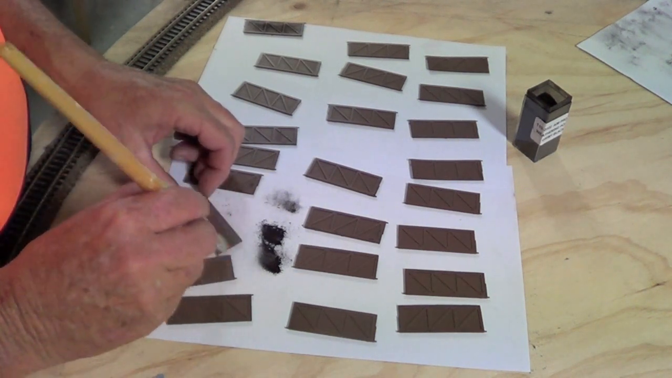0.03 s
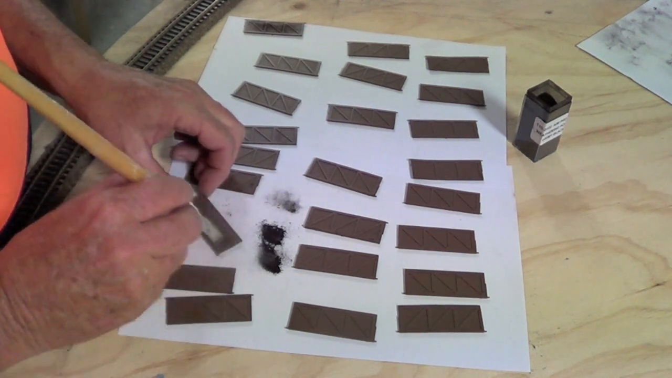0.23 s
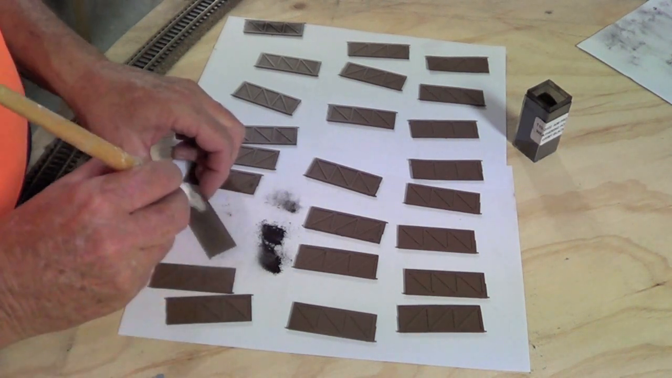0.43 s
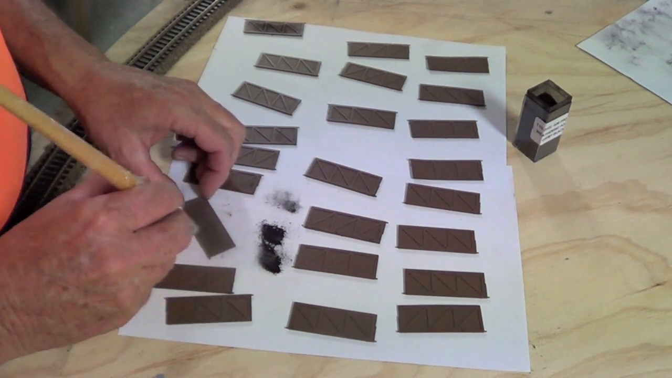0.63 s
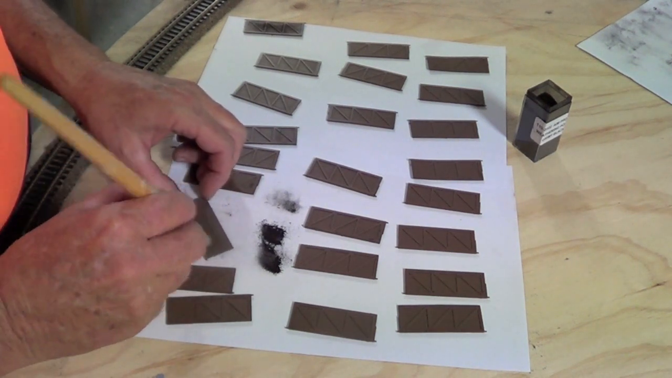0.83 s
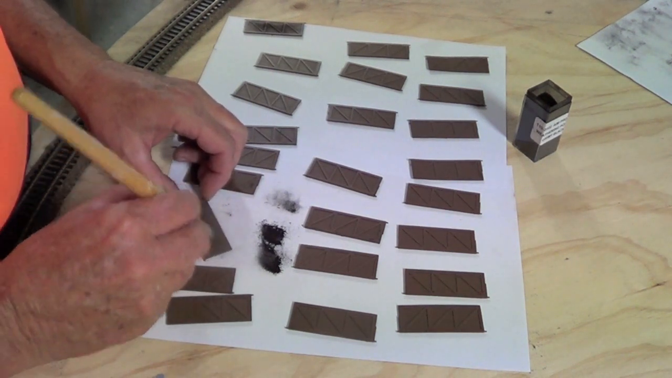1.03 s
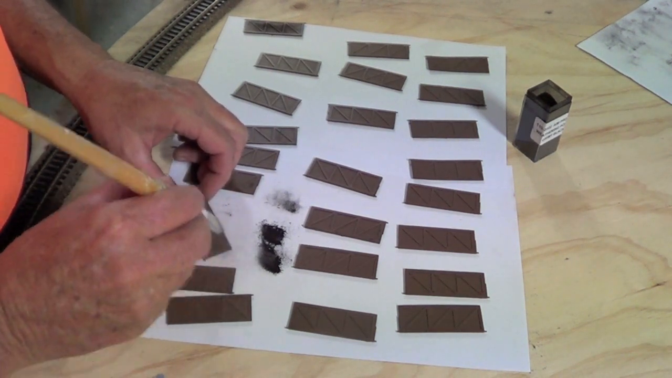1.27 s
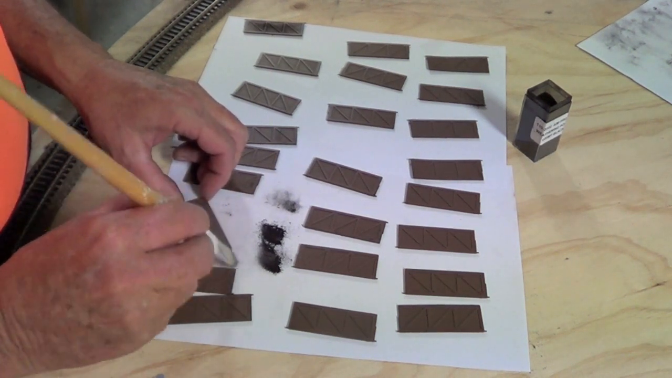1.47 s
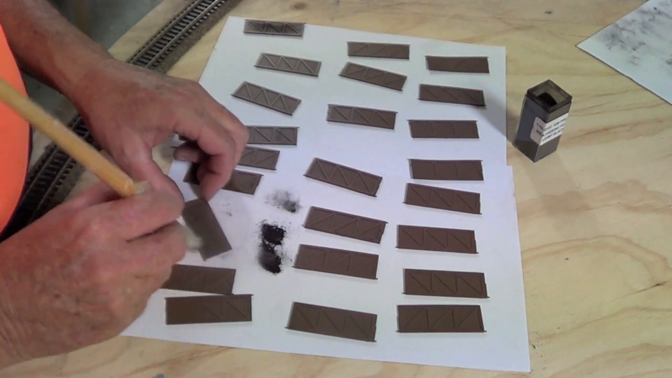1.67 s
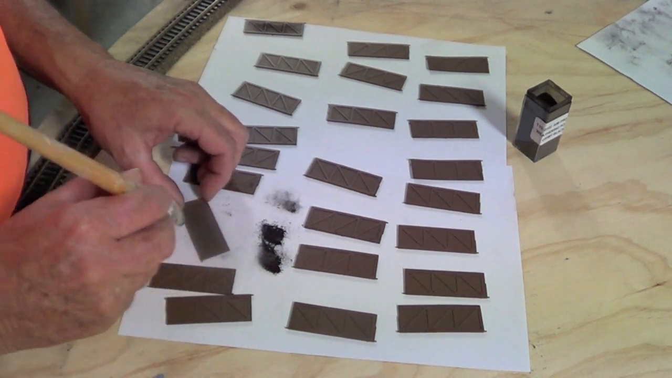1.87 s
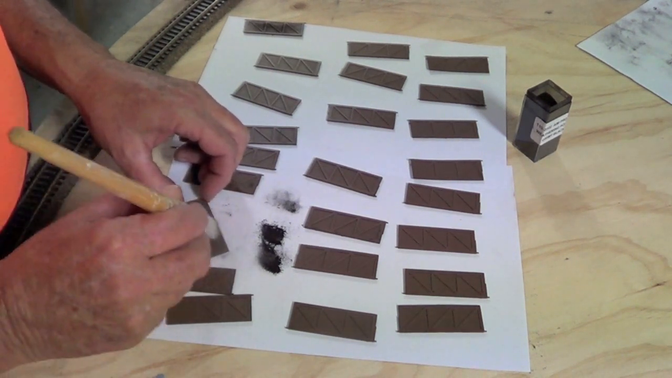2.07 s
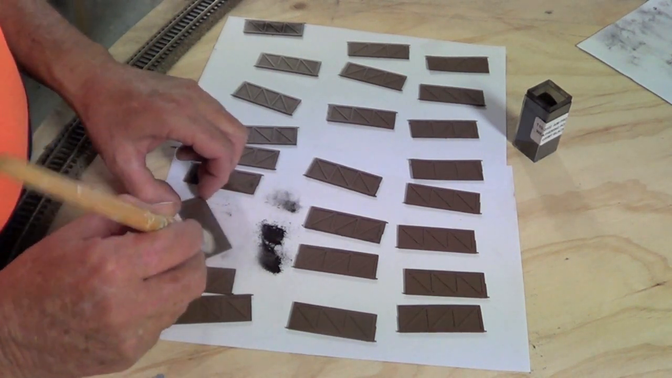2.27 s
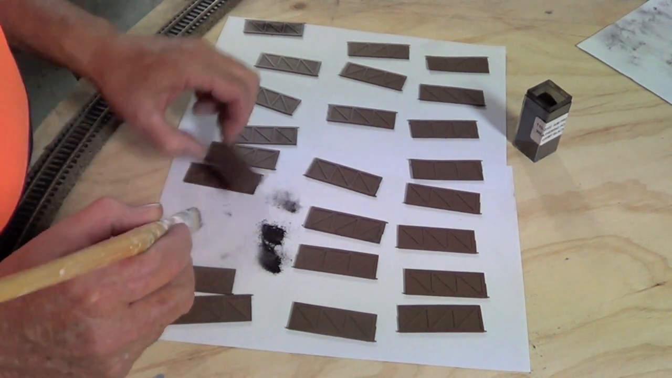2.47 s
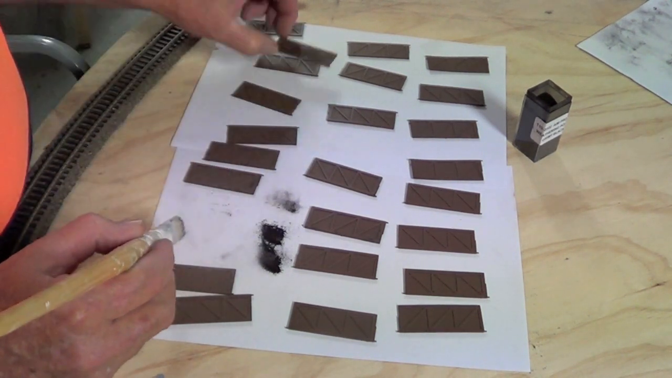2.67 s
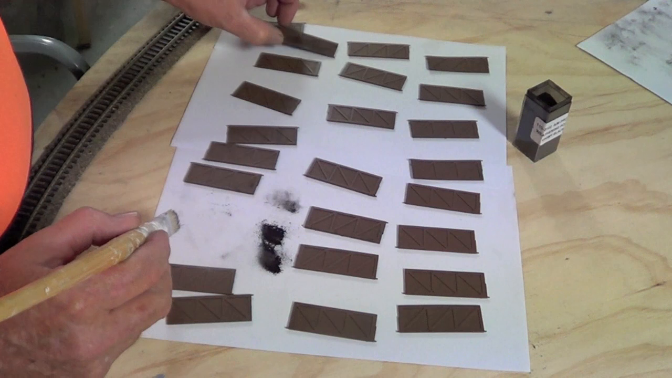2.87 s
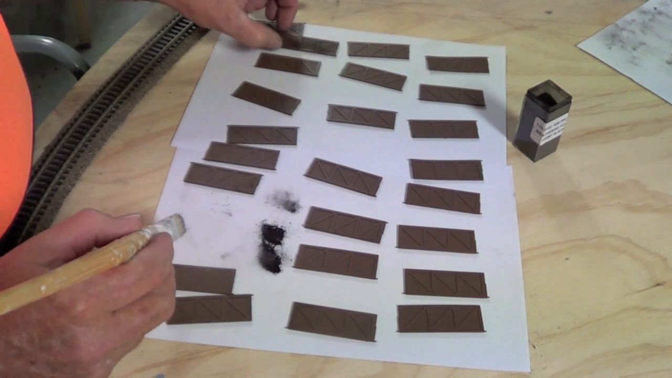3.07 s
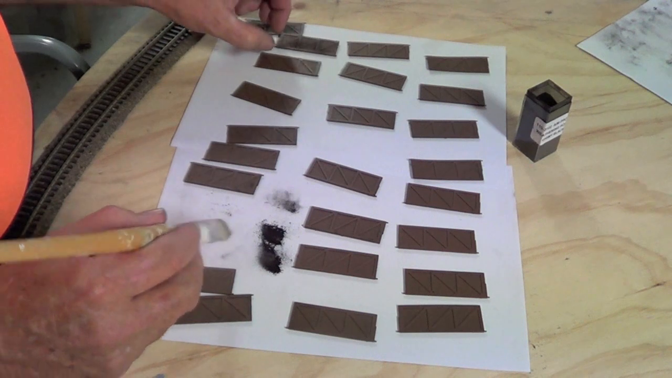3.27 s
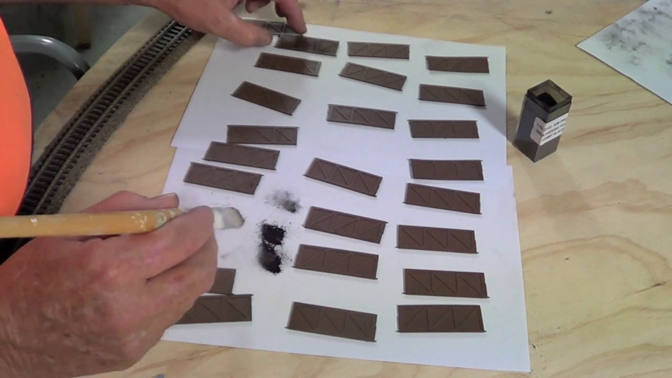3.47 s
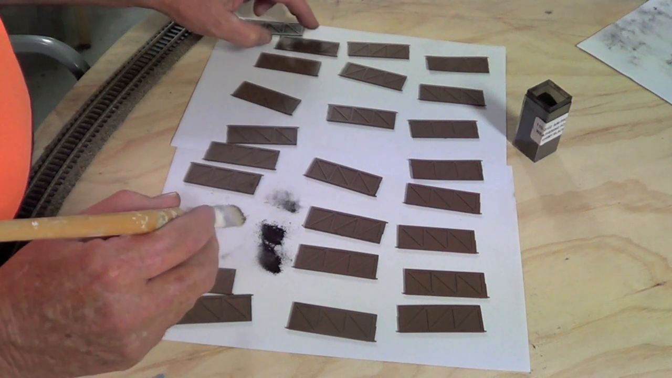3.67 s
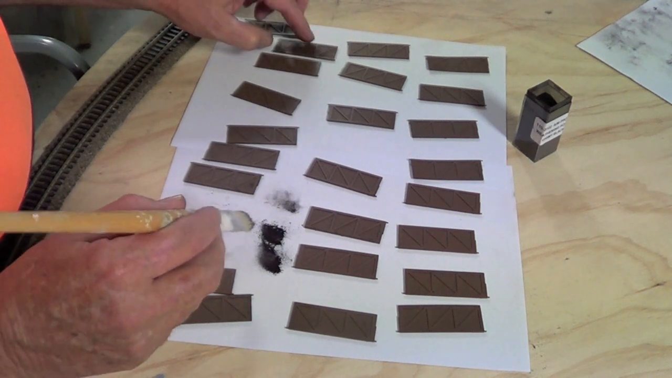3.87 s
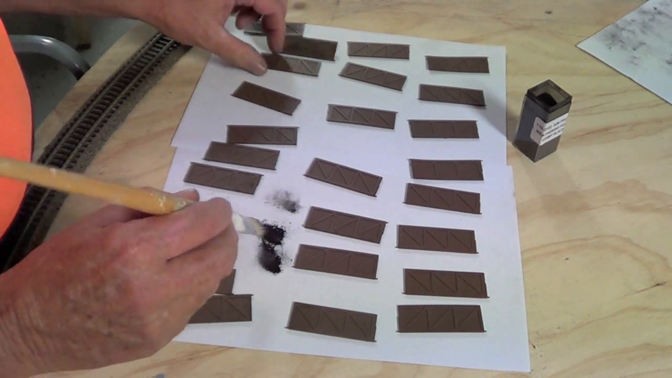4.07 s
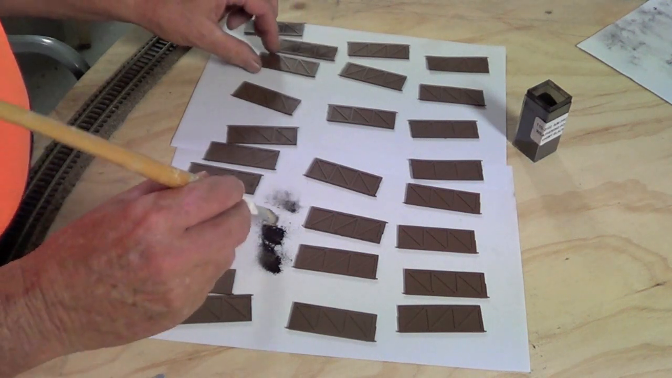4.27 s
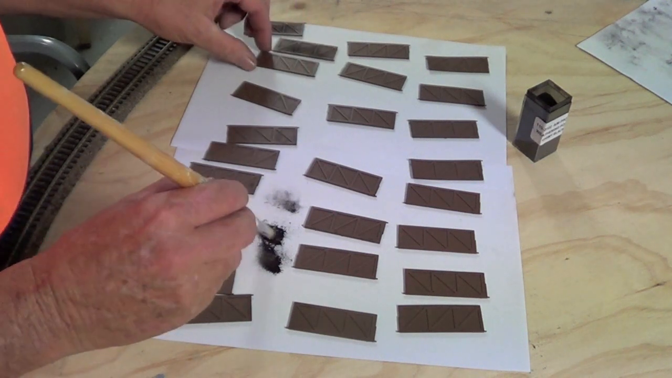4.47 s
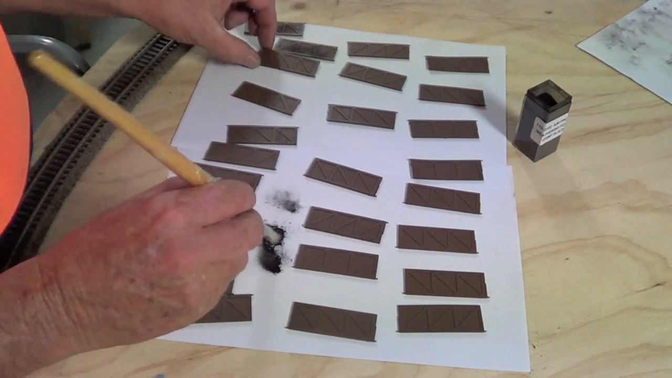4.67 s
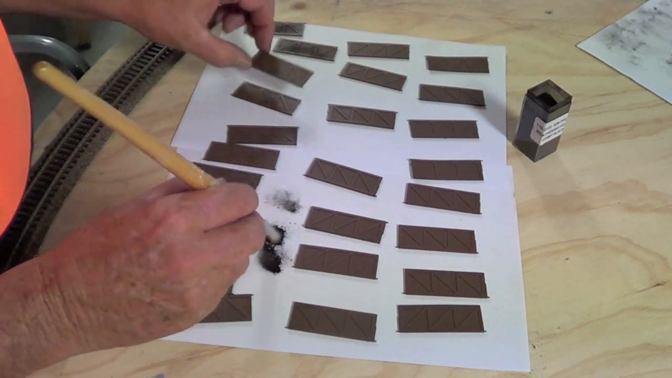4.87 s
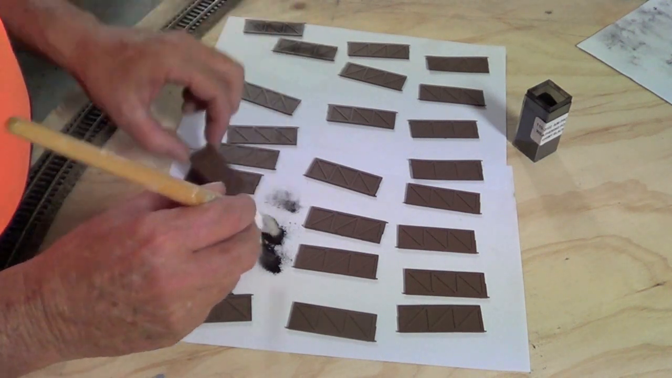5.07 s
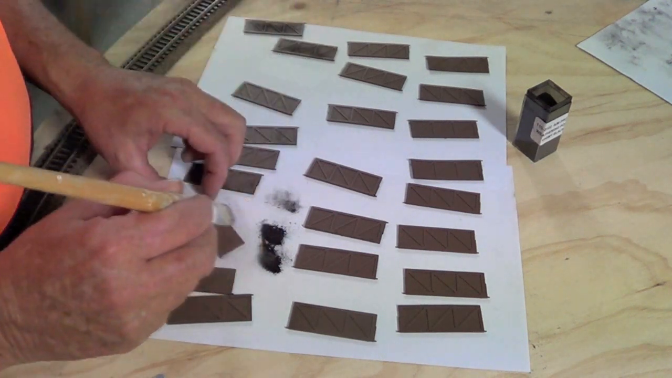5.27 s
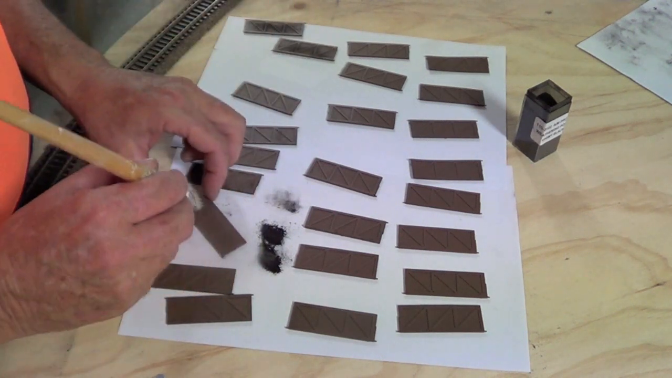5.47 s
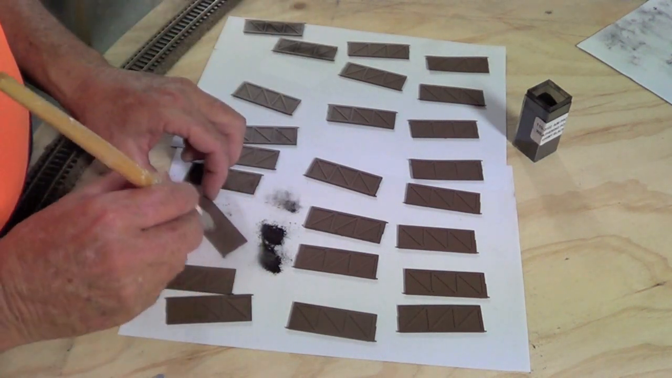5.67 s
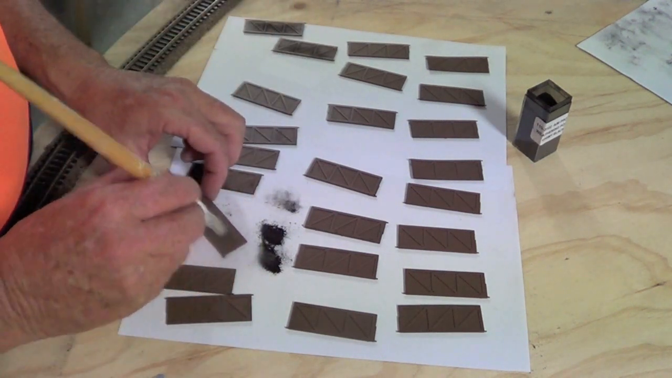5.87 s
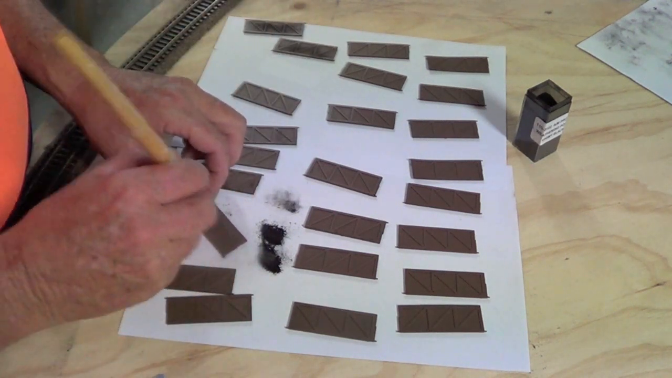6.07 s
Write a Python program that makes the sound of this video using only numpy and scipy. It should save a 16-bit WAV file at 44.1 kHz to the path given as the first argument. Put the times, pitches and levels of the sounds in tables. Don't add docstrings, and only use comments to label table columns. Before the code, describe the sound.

In a small workroom, dry scratchy brush strokes come in quick bursts, crackling as stiff bristles snap across thin plastic. A quiet gap follows, then a plastic piece clicks onto the bench, and the brush dabs powder with tiny ticks, a short squeak and sharper knocks on wood. Brief scrubbing returns at the end. Everything is close-miked over a low, soft fan hum and a faint steady high whine.

```python
import sys
import numpy as np
from scipy import signal
from scipy.fft import rfft, irfft, next_fast_len
from scipy.io import wavfile
from scipy.ndimage import uniform_filter1d

SR = 44100
rng = np.random.default_rng(int(sys.argv[2]) if len(sys.argv) > 2 else 0)


def to_linear_factor(level_db):
    exponent = np.asarray(level_db, float) / 20
    return 10 ** exponent


def dump_mix(stems):
    frames = np.atleast_2d(stems).T
    limited = np.clip(frames, -1, 1)
    pcm = np.round(limited * 32767).astype(np.int16)
    wavfile.write(sys.argv[1], SR, pcm)


N = 269451
TIME = np.arange(N) / SR

# (frequency [Hz], density [dB per Hz])
FAN_AIR = [(20, -22), (45, 0), (91, 0.5), (234, -6), (400, -11), (949, -8), (1900, -14), (3160, -20.5),
           (4000, -21), (5400, -17.5), (6800, -23.5), (9400, -26), (12000, -25), (16000, -25.5)]
# (frequency [Hz], side minus mid [dB])
FAN_SIDE = [(60, -36), (110, -24), (200, -14), (380, -3.5), (700, -5), (1290, -4.5), (2380, -3.5),
            (4400, 2.5), (8120, -13.5), (15000, -34)]
# (time [s], level [dB])
FAN_SWELL = [(0.0, -53), (0.87, -54), (1.19, -54.5), (1.94, -54.5), (2.47, -56.5), (3.74, -56),
             (4.19, -55.5), (4.49, -56), (4.99, -56.5), (5.36, -56.5), (5.65, -56), (6.11, -57)]
# (frequency [Hz], width [Hz], level [dB rms])
FAN_HUMS = [(56, 13, -63), (101.4, 17, -57), (165, 19.4, -60.5), (284.7, 5.5, -60.5), (605, 1, -72.5)]
# (frequency [Hz], level [dB rms])
WHINE = [(3601, -79), (4000, -67), (4048, -69), (4102, -67), (4151, -74), (4199, -76), (4253, -76),
         (4350, -77), (4398, -75), (4500, -76), (4597, -74), (4651, -74), (4700, -69), (4802, -72),
         (5050, -77), (5152, -74), (5303, -64), (5399, -70), (5448, -71), (8500, -77), (8549, -74),
         (8603, -71), (8651, -75), (9200, -67), (9249, -70), (9302, -67), (9351, -75), (9399, -73),
         (9502, -75), (10401, -81)]
# (frequency [Hz], level [dB rms])
BUZZ = [(3300, -84), (3700, -85.5), (5000, -97), (6000, -102.5), (6600, -115.5), (7900, -87), (8600, -85),
        (8920, -83), (9300, -77), (9700, -84), (10600, -92), (11500, -92)]
MAINS_HZ = 50

# (time [s], rise [ms], peak level [dB], fade [dB/s], bent bristles [dB])
LANDINGS = [
    (0.056, 15, -37.5, 550, 1.5),
    (0.607, 8.9, -39.5, 650, -14),
    (0.85, 13, -36, 600, 1.5),
    (1.102, 7, -38, 500, -7),
    (1.444, 10.7, -33.5, 1000, -4),
    (1.755, 11, -37.5, 500, -9),
    (2.032, 11, -42, 350, -9),
    (2.247, 8, -44.5, 400, 1.5),
    (5.962, 9, -43, 500, -6),
]
# (time [s], rise [ms], peak level [dB], fade [dB/s], bent bristles [dB])
DABS = [(2.958, 16, -58, 200, -4), (3.005, 20, -60, 300, -3), (3.648, 10, -56, 260, -3),
        (3.7, 28, -65, 280, -5), (3.858, 10, -51.5, 150, -5), (4.122, 9.2, -54.5, 150, -6),
        (4.316, 8.7, -57, 130, 1.5), (4.39, 30, -59, 300, -5), (4.46, 35, -52.5, 250, -3),
        (4.54, 3.4, -49, 160, 0), (4.766, 6, -49.5, 400, -10), (4.79, 25, -58, 250, -10),
        (4.972, 19, -42.5, 800, -5.5), (5.01, 31, -52, 350, -4), (5.3, 10, -61, 400, -8),
        (5.338, 8, -59, 190, -8)]
# (time [s], length [ms], first level [dB], last level [dB], thin top at the end [dB])
SWEEPS = [(0.092, 74, -46.5, -38.5, -6), (0.275, 33, -60, -45.5, -18), (0.322, 79, -44, -38.5, -15),
          (0.625, 87, -46, -47.5, -11), (0.887, 32, -49, -37.5, -11), (0.925, 30, -44, -46, -8),
          (1.472, 20, -59, -41.5, -10), (1.777, 22, -39, -44, -4), (2.06, 19, -53, -41, -12),
          (2.092, 29, -45, -48.5, -11), (5.73, 35, -54, -44, -14), (5.776, 34, -44, -44, -13),
          (5.977, 39, -45, -39, -10), (6.035, 31, -40, -47, -13)]
# (time [s], length [ms], first level [dB], last level [dB], thin top at the end [dB])
FLICKS = [
    (1.117, 82, -43.5, -38.5, -5),
    (1.503, 54, -44, -44, -5),
    (1.81, 41.7, -51, -38.5, 0),
    (2.283, 48.4, -50.5, -43.5, -12),
]
# (frequency [Hz], density [dB per Hz])
BRISTLE = [(1800, -37), (3000, -27.5), (3620, -12.5), (4000, -14), (4700, -12.5), (5400, -2), (6200, -5.5),
           (7000, -2), (8200, -6), (8900, 1), (9700, -1.5), (10700, 0.5), (12500, -12.5), (16000, -20)]
RISE_DB, GRIP_DB_S = 24.5, 1500
LIFT_DB_S = (430, 380, 480)
FLICK_FASTER = 2.4
SWEEP_BENT_DB, SWEEP_TOP_DB = (-1.4, -2.5), -12
LAND_TOP_DB, DAB_TOP_DB = -14, -5.5
RASP_DB, RASP_SHARE = (-66, -59.5, -58.5), 0.69
GRIT_DB = (3.8, 4.9, 3.6, 1.6)

# (time [s], peak level [dB], low part [dB])
SNAPS = [(0.065, -29, -14), (0.0712, -30, -21), (0.2823, -31, -24), (0.306, -24, -28), (0.341, -24, -23),
         (0.349, -20.5, -24), (0.3524, -23, -22), (0.361, -19.5, -21), (0.365, -21, -21), (0.384, -25, -17),
         (0.1874, -33, -22), (0.404, -29, -16), (0.614, -25, -22), (0.636, -20, -31), (0.724, -27.5, -23),
         (0.8589, -35, -26), (0.872, -29, -27), (1.1098, -23.5, -30), (1.4511, -24, -20),
         (1.4933, -27, -16), (1.503, -26, -11), (1.53, -23.5, -14), (1.7706, -25, -24), (1.7834, -27, -9.5),
         (2.0368, -30, -22), (2.0732, -26, -24), (2.076, -30, -24), (2.0835, -23, -28), (2.2535, -25, -31),
         (2.266, -23, -24)]
SNAP_MS = 1.52
# (time [s], peak level [dB], low part [dB], burst length [ms])
TAPS = [(0.3935, -15.5, -26, 2.2), (3.5165, -54, 7, 2.5), (3.597, -52.5, 8.5, 3.5), (3.6582, -34, -17, 1.4),
        (3.671, -34, -13, 1.4), (3.7289, -35, -13, 1.6), (3.863, -34.5, -14, 1.4), (4.1355, -31, -11, 1.3),
        (4.3137, -19, -10, 0.94), (4.323, -34, -15, 1.4), (4.3444, -34, -5, 1.2), (4.4967, -31, -21, 1.4),
        (4.539, -16, -14.5, 0.64), (4.5472, -27.5, -15, 0.7), (4.769, -34, -15, 7.5), (4.98, -33, -21, 6.8),
        (4.99, -38, -25, 1.5), (5.349, -35.5, -16, 1.4), (5.9698, -36, -16, 1.4), (2.978, -38, -22, 1.4),
        (3.013, -39, -22, 1.4)]
# (time [s], peak level [dB], length [ms])
SQUEAKS = [
    (3.864, -29, 35),
]
# (time [s], peak level [dB], chatter length [ms])
SET_DOWN = [
    (3.1365, -39, 1.1),
    (3.1455, -19, 1.3),
    (3.1506, -22, 3.3),
    (3.1532, -21.5, 2.1),
    (3.1596, -40, 2.3),
    (3.1825, -49, 3),
]
# (frequency [Hz], width [Hz], level [dB])
PART = [(3520, 120, -9.5), (5070, 220, -5), (5420, 120, -8), (6400, 160, -7), (7060, 63, -13.5),
        (6870, 35, -13), (6690, 60, -15), (8830, 300, 1), (9800, 260, 2), (10040, 260, 1), (11170, 90, -13),
        (13300, 420, -4), (15000, 600, -16)]
# (time [s], peak level [dB], contact time [ms])
KNOCKS = [
    (4.135, -32, 3.36),
    (4.3138, -33, 0.8),
    (4.5396, -32, 0.35),
]
# (frequency [Hz], width [Hz], level [dB])
BENCH = [(170, 78, -5), (362, 29, -3.5), (439, 31, -4), (540, 110, -2), (757, 76, 1), (876, 79, -0.5),
         (1210, 120, 0), (1680, 150, 2), (2250, 330, -16)]
# (frequency [Hz], reverberation time [s])
ROOM_T60 = [(200, 0.46), (1000, 0.63), (5000, 0.48), (12000, 0.088)]
PORT_LAG = 23
TOP_HZ = 15900

SIDES = np.array([[1], [-1]])


def level(x, db):
    return x * to_linear_factor(db) / np.sqrt(np.mean(x ** 2))


def read(table, hz):
    f, v = np.transpose(table)
    return np.interp(np.log(np.maximum(hz, 1)), np.log(f), v)


def colour(x, table):
    cepstrum = irfft(np.log(to_linear_factor(read(table, np.fft.rfftfreq(2048, 1 / SR)))))
    cepstrum[1:1024] *= 2
    cepstrum[1025:] = 0
    return signal.fftconvolve(x, irfft(np.exp(rfft(cepstrum))))[:N]


def band(x, lo_hz, hi_hz):
    return signal.sosfilt(signal.butter(2, [lo_hz, hi_hz], "band", fs=SR, output="sos"), x)


def ring(x, modes):
    out = 0
    for k, (hz, width, db) in enumerate(modes):
        pole = np.exp((2j * np.pi * hz - np.pi * abs(width)) / SR)
        out = out + (-1) ** k * to_linear_factor(db) * signal.lfilter([1], [1, -pole], x).imag
    return out


def bursts(events, db, length_ms):
    out = np.zeros(N + 4000)
    t = np.arange(4000) / SR
    noises = rng.standard_normal((len(events), len(t)))
    for s, gain, ms, noise in zip(events, to_linear_factor(db), length_ms, noises):
        i = int(s * SR)
        ms = max(ms, 0.05)
        fade = np.exp(-t * 1000 / ms)
        front = 1 - np.exp(-t * 4000 / ms)
        out[i:i + len(t)] += gain * np.tanh(2 * noise) * fade * front * 1.5
    return out[:N]


def held(samples):
    steps = np.repeat(rng.standard_normal(N // samples + 1), samples)[:N]
    return uniform_filter1d(steps, samples // 2)


def fan():
    size = next_fast_len(N)
    hz = np.fft.rfftfreq(size, 1 / SR)
    s, db = np.transpose(FAN_SWELL)
    swell = to_linear_factor(np.interp(TIME, s, db - np.mean(db)))
    air = to_linear_factor(read(FAN_AIR, hz)) * rfft(rng.standard_normal((2, size)))
    air[1] *= to_linear_factor(read(FAN_SIDE, hz))
    mid, side = level(irfft(air, size)[:, :N], -54) * swell
    for f, width, hum_db in FAN_HUMS[:3] + FAN_HUMS[4:]:
        mid = mid + level(ring(rng.standard_normal(N), [(f, width, 0)]), hum_db - 3.5)
    f, width, hum_db = FAN_HUMS[3]
    tremble = level(uniform_filter1d(rng.standard_normal((2, N)), int(SR / width / 4)), -16.5)
    tone = np.sqrt(2) * to_linear_factor(hum_db) * (1 + tremble[0]) * np.sin(2 * np.pi * f * TIME + tremble[1])
    return mid + tone + (side + to_linear_factor(-22.5) * np.roll(tone, 40)) * SIDES


def whine():
    hz, db = np.transpose(WHINE)
    cycle = np.zeros(SR // MAINS_HZ // 2 + 1)
    multiples = np.arange(len(cycle)) * MAINS_HZ
    weak = to_linear_factor(read(BUZZ, multiples) + 3.3 * rng.standard_normal(len(cycle)))
    cycle += weak * (multiples > 3300) * (multiples < 11500)
    cycle[np.round(hz / MAINS_HZ).astype(int)] = to_linear_factor(db + 1.0)
    phases = np.exp(2j * np.pi * rng.random((2, len(cycle))))
    one_cycle = irfft(cycle * phases) * len(cycle) * np.sqrt(2)
    mid, side = np.tile(one_cycle, N * MAINS_HZ // SR + 1)[:, :N]
    return to_linear_factor(1.0 * held(900)) * (mid + to_linear_factor(-34) * side * SIDES)


def pressure():
    t = TIME[::32]
    power, grit = np.full((4, len(t)), 1e-14), 0
    for kind, (rows, top_db) in enumerate([(LANDINGS, LAND_TOP_DB), (DABS, DAB_TOP_DB)]):
        for s, ms, db, fade, bent_db in rows:
            early = np.clip(1 - (t - s) * 1000 / max(ms, 1), 0, None)
            late = np.clip(t - s - ms / 1000, 0, None)
            tips = db - RISE_DB * early ** 2 - abs(fade) * late
            rasp = RASP_DB[kind] + RASP_SHARE * (tips + 45)
            gain = to_linear_factor(np.array([tips, tips + bent_db, tips + top_db, rasp])) ** 2 * (t > s)
            power, grit = power + gain, grit + GRIT_DB[kind] * gain[0]
    pulls = [(*row, 1) for row in SWEEPS] + [(*row, FLICK_FASTER) for row in FLICKS]
    for s, ms, first_db, last_db, top_db, lift in pulls:
        along = np.clip((t - s) * 1000 / max(ms, 1), 0, 1)
        pull = first_db + along * (last_db - first_db) - GRIP_DB_S * np.clip(s - t, 0, None)
        lifted = np.clip(t - s - ms / 1000, 0, None)
        tips, bent, top = (pull - lift * rate * lifted for rate in LIFT_DB_S)
        bent = bent + np.interp(along, [0, 1], SWEEP_BENT_DB)
        top = top + SWEEP_TOP_DB + along * (top_db - SWEEP_TOP_DB)
        rasp = RASP_DB[2] + RASP_SHARE * (tips + 45)
        gain = to_linear_factor(np.array([tips, bent, top, rasp])) ** 2
        power, grit = power + gain, grit + np.interp(along, [0, 1], GRIT_DB[2:]) * gain[0]
    return [np.interp(TIME, t, curve) for curve in (*np.sqrt(power), grit / power[0])]


def tufts(sound, edges_hz, patchy_db):
    total = 0
    for lo, hi in zip(edges_hz, edges_hz[1:]):
        total = total + to_linear_factor(patchy_db * held(250)) * band(band(sound, lo, hi), lo, hi)
    return level(total, 0)


def brush(slips_per_s, ribs_share, patchy_db):
    tips_gain, bent_gain, top_gain, rasp_gain, grit_db = pressure()
    grit_db = np.clip(grit_db, 0, 5)
    size = to_linear_factor(grit_db * np.minimum(rng.exponential(size=N), 2))
    slips = (rng.random(N) < slips_per_s / SR) * np.sign(rng.standard_normal(N)) * size
    slips = slips * to_linear_factor(ribs_share * grit_db * held(70))
    slips = slips / np.sqrt(uniform_filter1d(slips ** 2, 700) + 1e-9)
    sound = colour(slips, BRISTLE)
    bent = tufts(sound, [3000, 4600, 6100, 7800], patchy_db)
    tips = tufts(sound, [7800, 9300, 10400, 12000], patchy_db)
    top = tufts(sound, [12000, 14000, 18000], patchy_db)
    rasp = level(band(slips, 1080, 2820), 0.1)
    return tips_gain * tips + bent_gain * bent + top_gain * top + rasp_gain * rasp


def snaps():
    s, db, low_db, ms = np.transpose([(*row, SNAP_MS) for row in SNAPS] + TAPS)
    bright = colour(bursts(s, db + 1, ms), BRISTLE)
    tick = band(bursts(s, db + low_db + 7.5, ms), 3270, 6700)
    squeak = band(bursts(*np.transpose(SQUEAKS)), 9700, 9800)
    return bright + tick + squeak


def set_down():
    s, db, ms = np.transpose(SET_DOWN)
    return ring(bursts(s, db - 21.5, ms), PART)


def knocks():
    blow = np.zeros(N)
    for s, db, ms in KNOCKS:
        i = int(s * SR)
        push = np.hanning(int(max(ms, 0.1) * SR / 1000) + 2)
        blow[i:i + len(push)] = to_linear_factor(db) * push / push.sum()
    return to_linear_factor(-3.5) * ring(blow, BENCH) + to_linear_factor(22.5) * band(blow, 330, 2000)


def room(x, wet_db, side_db):
    t = np.arange(int(0.5 * SR)) / SR
    tail = 0
    for hz in 250 * 2 ** np.arange(7):
        octave = band(rng.standard_normal((2, len(t))), hz / np.sqrt(2), min(hz * np.sqrt(2), 0.45 * SR))
        tail = tail + octave * to_linear_factor(-60 * t / read(ROOM_T60, hz))
    tail = tail * (1 - np.exp(-t / 0.0024))
    mid, side = (signal.fftconvolve(x, h / np.sqrt(np.sum(h ** 2)))[:N] for h in tail)
    return to_linear_factor(wet_db) * (mid + to_linear_factor(side_db) * side * SIDES)


def scene():
    hands = brush(slips_per_s=7000, ribs_share=0.38, patchy_db=2.34) + snaps()
    part, wood = set_down(), knocks()
    left_db = 0.65 * ((TIME < 2.5) | (TIME > 5.6))
    direct = to_linear_factor(np.array([left_db, -left_db])) * hands + part + wood
    echo = to_linear_factor(-21) * np.roll(hands + part, PORT_LAG) * SIDES
    wet = room(hands, -10.5, -36) + room(part, -7.5, -15) + room(wood, -0.56, -14)
    return direct + echo + wet + whine() + fan()


def top_cut(x):
    return signal.sosfilt(signal.butter(12, 16630, fs=SR, output="sos"), x)


def record(dry):
    cut = signal.sosfilt(signal.ellip(10, 0.3, 70, TOP_HZ, fs=SR, output="sos"), dry)
    return top_cut(cut)


dry = scene()
out = record(dry)
dump_mix(out)
```